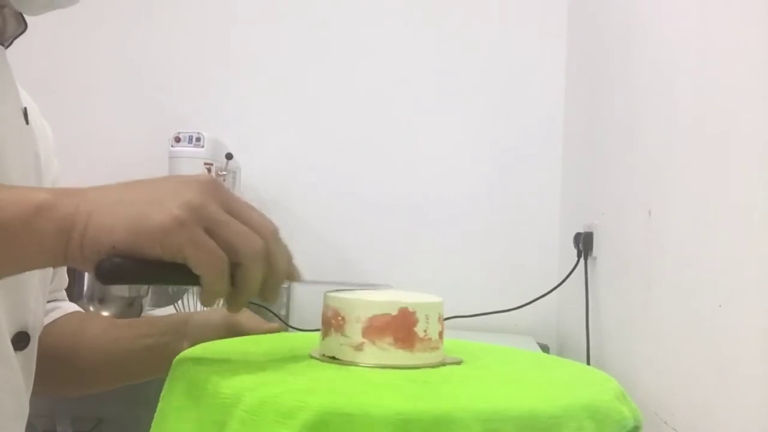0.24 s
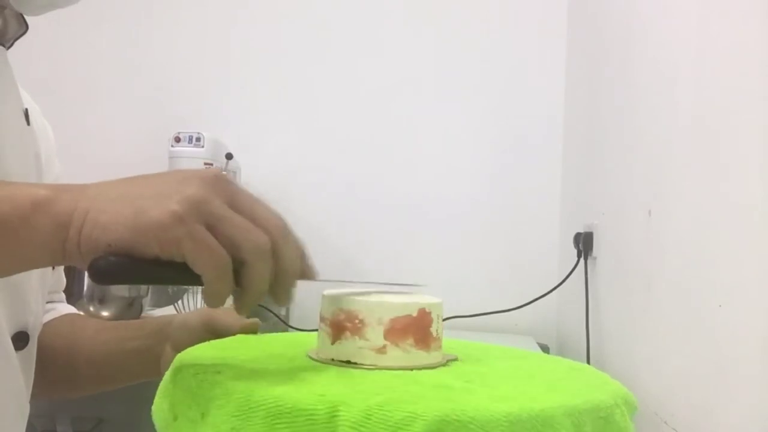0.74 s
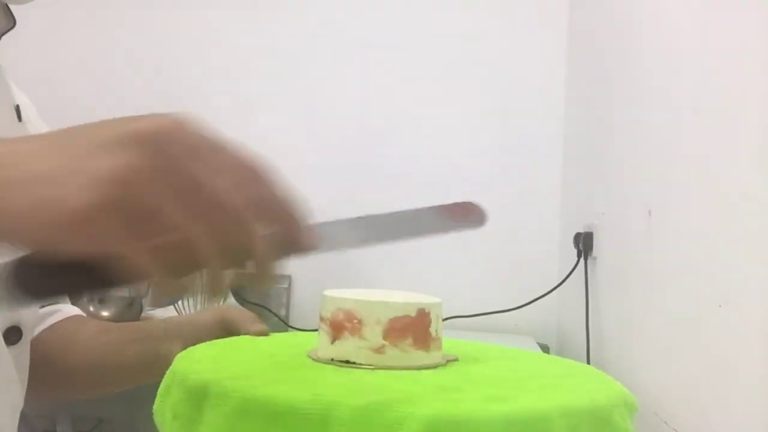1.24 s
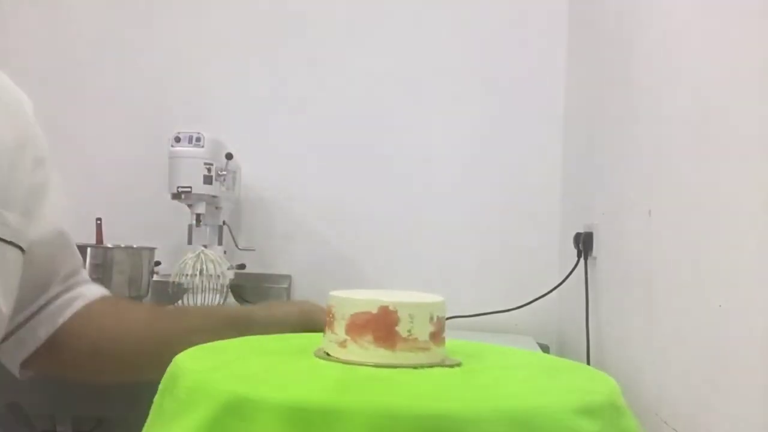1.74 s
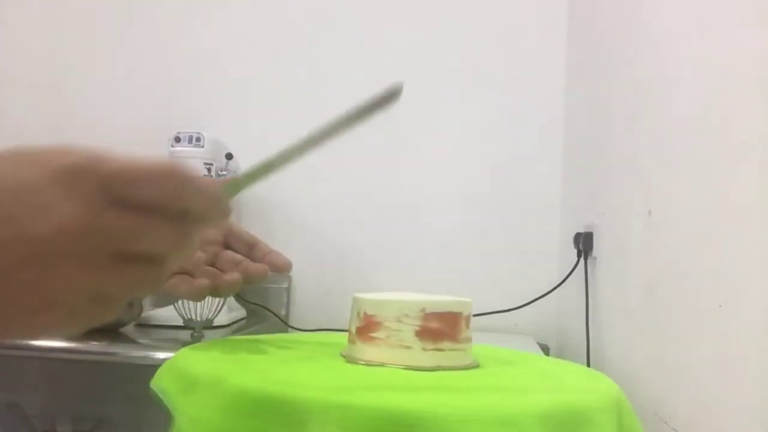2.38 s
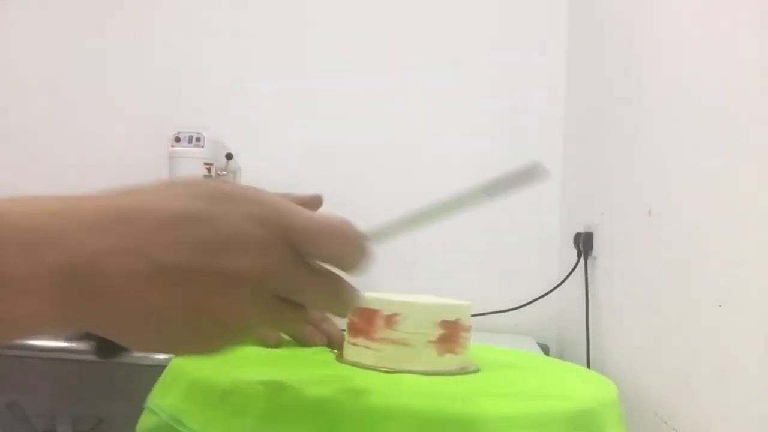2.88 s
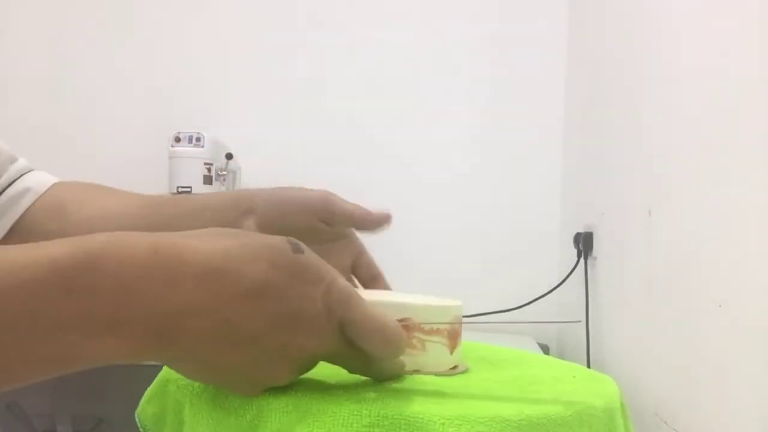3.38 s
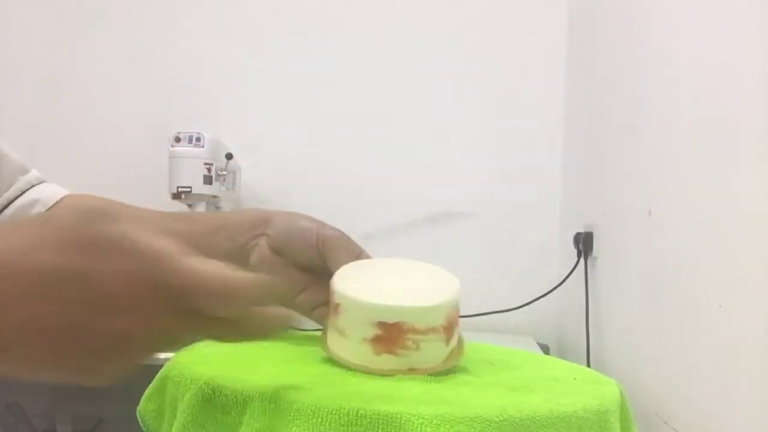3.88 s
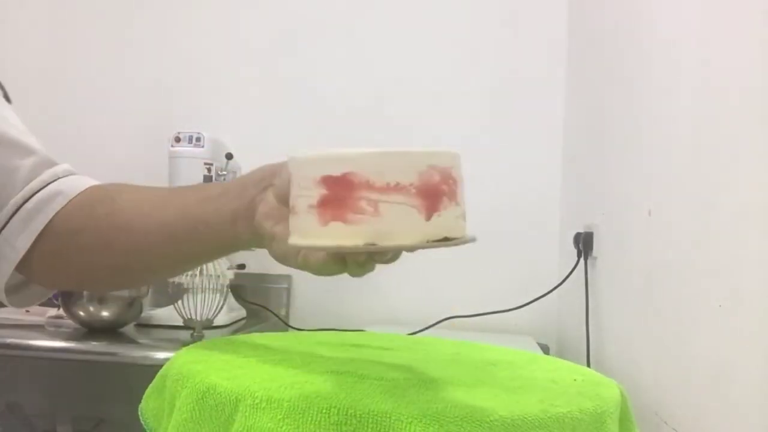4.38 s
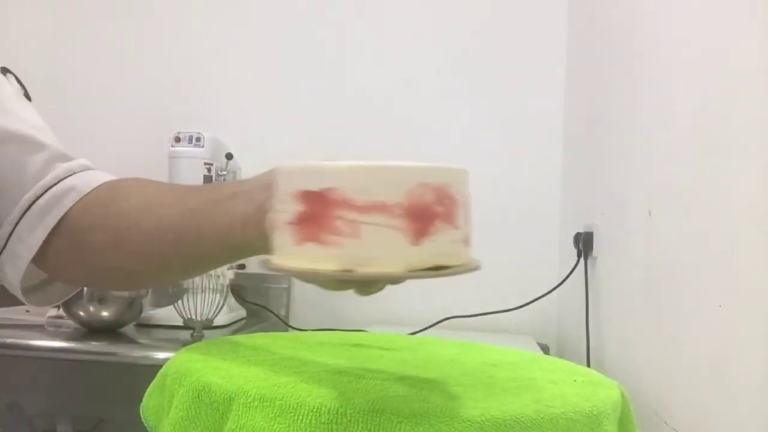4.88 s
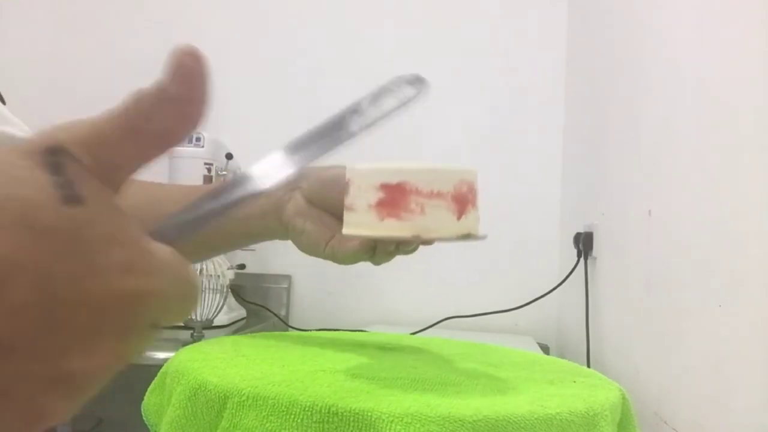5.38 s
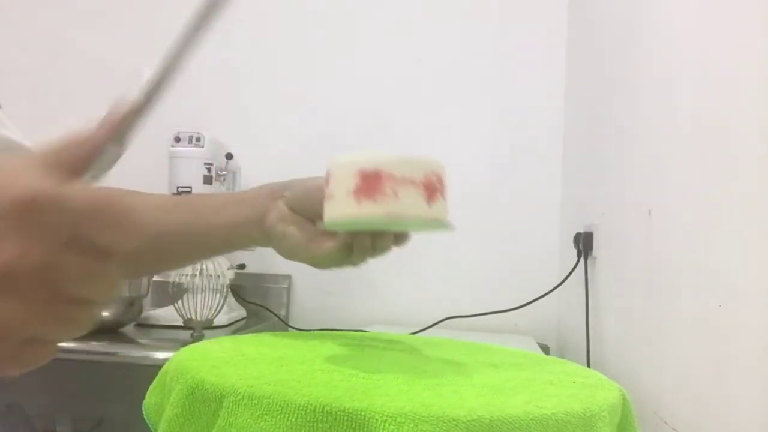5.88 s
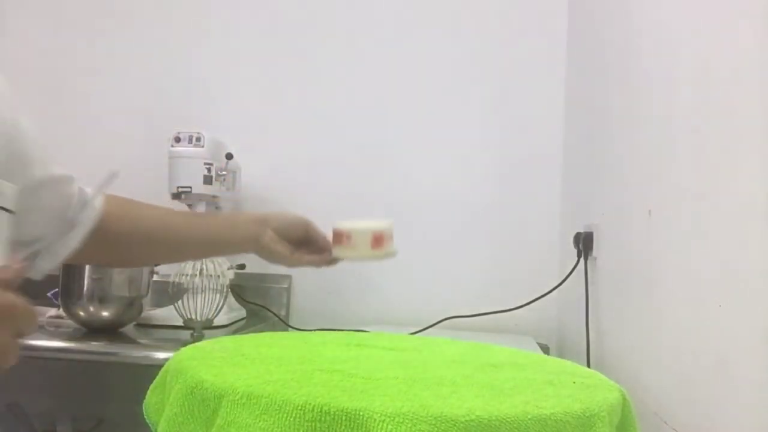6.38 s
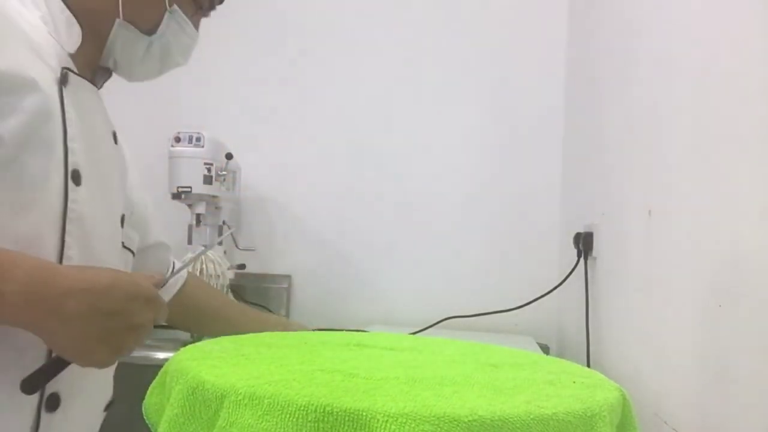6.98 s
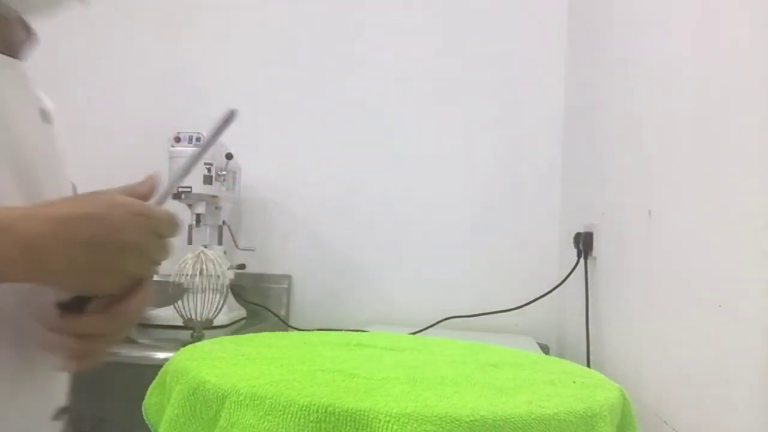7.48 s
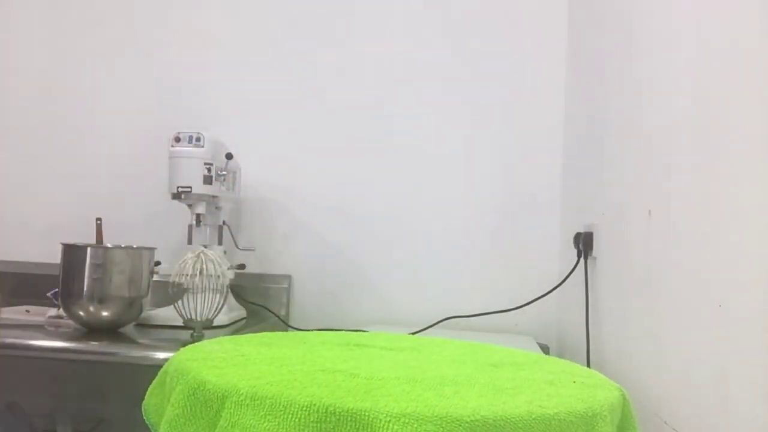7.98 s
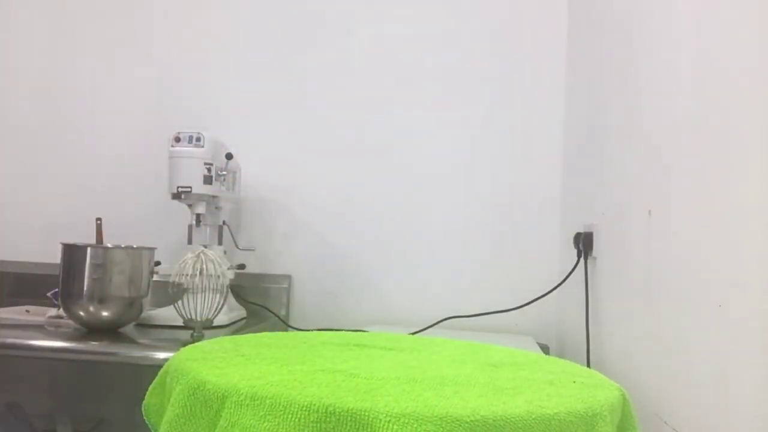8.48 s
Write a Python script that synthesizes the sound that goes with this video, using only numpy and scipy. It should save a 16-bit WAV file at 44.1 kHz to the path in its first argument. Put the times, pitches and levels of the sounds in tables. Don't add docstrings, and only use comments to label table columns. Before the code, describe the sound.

In a small hard-walled kitchen a refrigerator runs throughout, its deep hum mixed with wavering fan air and brief low floor rumbles. A wall clock ticks once a second, each tick followed by a weaker recoil. A padded knock and dull tap come early, a stronger knock with taps and thin metal clicks just past the middle. The camera microphone adds faint hiss and a tiny rapid flutter.

```python
import sys
import numpy as np
from scipy import signal
from scipy.fft import rfft, irfft
from scipy.io import wavfile
from scipy.ndimage import uniform_filter1d

SR = 44100
rng = np.random.default_rng(int(sys.argv[2]) if len(sys.argv) > 2 else 0)


def invert_db(level):
    return 10 ** (np.asarray(level, dtype=float) / 20)


def store_pcm(level_fs):
    pcm = np.round(np.clip(level_fs, -1, 1) * 32767).astype(np.int16)
    wavfile.write(sys.argv[1], SR, np.atleast_2d(pcm).T)


N = 385434
TIME_S = np.arange(N) / SR

SHAFT_HZ, MAINS_HUM_HZ, IN_STEP_S = 49.394, 99.957, .5518
SHAFT_DB, SHAFT_CREEP_DB_PER_S, MAINS_HUM_DB = -41.5, .28, -44.5
SHAFT_START_LOSS_DB, SETTLED_S, SETTLING_S = 2, 1.36, .15
# order, level_db
SHAFT_ORDERS = [(2, -52.5), (3, -63), (4, -64), (5, -68), (11, -65.5)]
# time_s, peak_db, length_s
FLOOR_SHAKES = [(.15, -44.5, 0.33), (.86, -45, 0.19), (1.15, -52, 0.12), (1.76, -46, 0.51),
                (2.12, -43, 0.44), (2.41, -47.5, 0.41), (3.15, -43, .2), (3.42, -45.5, .3), (4.02, -53, .3),
                (6.92, -47, .25), (7.45, -52, 0.2)]
RUMBLE_REST_DB = -61
# freq_hz, density_db
RUMBLE_SPECTRUM = [(33, -37), (44, -7.5), (56, -0.5), (78, -5.5), (95, -8.5), (140, -26.5)]

# freq_hz, level_db
BLADE_TONES = [(116.1, -57.5), (172.45, -59), (231.72, -61.5)]
# freq_hz, density_db
AIR_SPECTRUM = [(28, -50), (40, -20.5), (60, -15), (110, -12.5), (131, -17.5), (237, -15.5), (305, -19.5),
                (369, -13), (430, -26.5), (551, -20.5), (1490, -32), (2190, -33.5), (3300, -57.5),
                (4000, -71)]
AIR_DB = -47.5
# freq_hz, width_hz, level_over_air_db
DUCT_MODES = [(297, 19, 2), (335.7, 12.1, 6.5), (401, 14, 5), (640, 132, -0.5), (1219, 105, 2.5),
              (2196, 510, -3.5)]
# freq_hz, width_hz, level_db
SURGING_MODES = [
    (372.1, 11.2, -1),
    (238.4, 27, -2.5),
]
# time_s, peak_db, length_s
UPPER_AIR_SURGES = [(.1, -52, 0.59), (0.925, -48.5, 0.062), (1.68, -53, 0.26), (2.228, -47.5, 0.33),
                    (2.864, -50, 0.2), (3.24, -53.5, .3), (3.98, -51.5, 0.19), (4.304, -45.5, 0.13),
                    (4.67, -51, 0.083), (5.735, -49, 0.073), (6.3, -50.5, 0.34), (6.662, -45.5, 0.21),
                    (7.275, -44.5, 0.11), (7.55, -51.5, 0.12), (8.146, -52, 0.4), (8.648, -48.5, 0.28)]
# time_s, peak_db, length_s
LOWER_AIR_SURGES = [(.6, -52.5, 0.23), (.95, -52, 0.39), (2.044, -50, .15), (2.516, -50, 0.19),
                    (3.8, -55.5, 0.67), (5.335, -47, 0.12), (5.7, -51.5, 0.95), (6.137, -50, .15),
                    (6.36, -47, 0.23), (6.773, -50.5, 0.3), (7.503, -51, 0.18), (7.95, -54, .3),
                    (8.7, -50.5, 0.46)]
UPPER_REST_DB, LOWER_REST_DB = -58.5, -60.5

# freq_hz, density_db
HISS_SPECTRUM = [(2600, -16), (3300, -6), (3650, 3), (4200, -1.5), (4900, -6), (5500, -2), (6300, -0.5),
                 (7900, -3), (8300, -7.5), (9500, -7.5), (10500, -14.5), (11300, -11), (13500, -12.5),
                 (15100, -10)]
HISS_DB, HISS_WANDER_DB, HISS_WANDER_HZ = -79, .6, 8
BARREL_HZ, BARREL_WIDTH_HZ, BARREL_GAIN = 3610, 140, .45
PORT_DIP_HZ, PORT_DIP_WIDTH_HZ, PORT_HISS_WIDTH_HZ, PORT_HISS_SHARE = 4900, 900, 300, .2
FRAME_HZ, FRAME_START_S = 29.995, .0008
READOUT_GAP_S, READOUT_GAP_LENGTH_S, READOUT_SAG_DB = .0128, .003, -1
# freq_hz, density_db
LENS_BURST_SPECTRUM = [(1200, 2), (2000, 2.5), (2800, -4), (3700, -17), (4900, -32), (6400, -12.5),
                       (8200, -22), (10500, -38), (15000, -33)]
LENS_BURST_DB, LENS_PEAK_S, LENS_WIDTH_S = -61.5, .0032, .0017
# freq_hz, density_db
LENS_RING_SPECTRUM = [(2300, 1), (2900, -1.5), (3400, -10.5), (3700, -4), (4400, -13), (5000, -31.5),
                      (6500, -14), (9000, -27)]
LENS_RING_DB, LENS_RING_S = -74.5, .0098

TICK_START_S, TICK_PERIOD_S, RECOIL_S, RECOIL_DB = .32205, 1.00406, .1731, -7.8
# delay_ms, low_modes_db, high_modes_db
TICK_CONTACTS = [
    (.03, -10, -13),
    (.48, 0, 0),
    (1.47, -4, -20),
    (1.78, -12.5, -19),
    (3.96, -16, -30),
]
# freq_hz, level_db, t60_s
CLOCK_LOW_MODES = [(2204, -41.5, .014), (1831, -45.5, .016), (1550, -39, .0057), (2723, -54.5, .015)]
# freq_hz, level_db, t60_s
CLOCK_HIGH_MODES = [(4177, -77, .016), (6237, -59.5, .004), (7243, -55, .0026), (8007, -74, .008)]
SOFT_HZ = 2900
ROOM_T60_S, ROOM_DB = .25, -12.5

# time_s, peak_db
TABLE_KNOCKS = [
    (0.904, -42),
    (4.66, -39.5),
]
# freq_hz, level_db, t60_s
TABLE_MODES = [(240, 5, 0.052), (366, 6.5, 0.03), (617, -5, 0.025)]
# time_s, peak_db
TABLE_TAPS = [
    (1.0368, -49),
    (4.7705, -56),
    (4.7924, -43),
    (4.7975, -47),
    (5.6678, -55),
]
# freq_hz, level_db, t60_s
TAP_MODES = [(2100, 2, .017), (1660, -13, .011)]
# time_s, peak_db, top_modes_re_low_db
BLADE_CLICKS = [
    (1.669, -71, -6),
    (2.5958, -66, -7),
    (4.7922, -78.5, -9),
    (4.7972, -65, -5),
    (4.806, -71, -10),
    (5.1141, -59, 1),
    (5.12, -66, -11),
]
# freq_hz, level_db, t60_s
BLADE_LOW_MODES = [(4300, -3, 0.0089), (5200, 2, .010), (6300, -0.5, 0.011), (7400, 1, .005)]
# freq_hz, level_db, t60_s
BLADE_TOP_MODES = [(8900, 2, .004), (11000, -5, .0026), (13200, -11, .0026)]

SWISH_S, SWISH_DB, SWISH_RISE_DB_PER_S, SWISH_FALL_DB_PER_S = 8.034, -82, 70, 500
BRIGHTENING = 2.2
# freq_hz, density_db
SLEEVE_DULL = [(6500, -17), (8300, -1), (9800, 0), (10500, -15)]
SLEEVE_BRIGHT = [(10500, -12), (11500, 2), (13500, 0), (15000, -8)]


def coloured(gain_at):
    hz = np.maximum(np.fft.rfftfreq(N, 1 / SR), 1)
    noise = irfft(rfft(rng.standard_normal(N)) * gain_at(hz), N)
    return noise / noise.std()


def slope(points):
    point_hz, point_db = np.transpose(points)
    return lambda hz: invert_db(np.interp(np.log(hz), np.log(point_hz), point_db, left=-80, right=-80))


def peak(hz, width_hz):
    return lambda f: 1 / (1 + (2 * (f - hz) / width_hz) ** 2)


def drift(rate_hz):
    return coloured(lambda hz: 1 / (1 + (np.fft.rfftfreq(N, 1 / SR) / rate_hz) ** 2))


def tone(hz, rms_db, turns):
    return np.sqrt(2) * invert_db(rms_db) * np.cos(2 * np.pi * (hz * (TIME_S - IN_STEP_S) + turns))


def swells(events, rest_db):
    power = invert_db(2 * rest_db)
    for at_s, peak_db, length_s in events:
        power = power + invert_db(2 * peak_db) * np.exp(-(2 * (TIME_S - at_s) / length_s) ** 2)
    return 10 * np.log10(power)


def strikes(times_s, peak_db):
    force = np.full(N, 1e-18)
    np.add.at(force, np.round(np.asarray(times_s) * SR).astype(int), invert_db(np.asarray(peak_db)))
    return force


def softened(force):
    return signal.sosfilt(signal.butter(3, SOFT_HZ, fs=SR, output="sos"), force)


def ring(force, modes):
    out = np.zeros(N)
    for k, (hz, db, t60_s) in enumerate(modes):
        radius = invert_db(-60 / (t60_s * SR))
        angle = 2 * np.pi * hz / SR
        resonator = [0, np.sin(angle)], [1, -2 * radius * np.cos(angle), radius ** 2]
        out += (-1) ** k * invert_db(db) * signal.lfilter(*resonator, force)
    return out


def compressor():
    start_loss_db = SHAFT_START_LOSS_DB / (1 + np.exp((TIME_S - SETTLED_S) / SETTLING_S))
    shaft_db = SHAFT_DB + SHAFT_CREEP_DB_PER_S * TIME_S - start_loss_db
    hum = tone(SHAFT_HZ, shaft_db, 0) + tone(MAINS_HUM_HZ, MAINS_HUM_DB, 0)
    for order, db in SHAFT_ORDERS:
        turns = rng.random() if order > 2 else 0
        hum += tone(order * SHAFT_HZ, db + 1.3 * drift(1.0), turns)
    rumble_db = swells(FLOOR_SHAKES, RUMBLE_REST_DB) - 2.0
    return hum + invert_db(rumble_db) * coloured(slope(RUMBLE_SPECTRUM))


def fans():
    out = np.zeros(N)
    for hz, db in BLADE_TONES:
        out += tone(hz, db + 1.7 * drift(.5), rng.random() + .04 * drift(.15))

    air_gain = slope(AIR_SPECTRUM)
    every_hz = np.fft.rfftfreq(N, 1 / SR) + 1
    air_power = np.mean(air_gain(every_hz) ** 2)
    air = coloured(air_gain)
    for hz, width_hz, db in DUCT_MODES:
        mode = peak(hz, width_hz)
        share = np.mean(mode(every_hz) ** 2) * air_gain(hz) ** 2 / air_power
        air += invert_db(db) * np.sqrt(share) * coloured(mode)

    surges_db = [swells(UPPER_AIR_SURGES, UPPER_REST_DB), swells(LOWER_AIR_SURGES, LOWER_REST_DB)]
    for (hz, width_hz, db), surge_db in zip(SURGING_MODES, surges_db):
        blown = coloured(peak(hz, width_hz))
        steady = blown / np.sqrt(uniform_filter1d(blown ** 2, size=SR // 5))
        out += invert_db(db + surge_db) * steady
    return out + invert_db(AIR_DB) * air


def camera():
    barrel, port = peak(BARREL_HZ, BARREL_WIDTH_HZ), peak(PORT_DIP_HZ, PORT_HISS_WIDTH_HZ)
    spectrum = slope(HISS_SPECTRUM)
    hiss = coloured(lambda hz: spectrum(hz) * (1 + BARREL_GAIN * barrel(hz)) * (1 - PORT_HISS_SHARE * port(hz)))
    since_s = (TIME_S - FRAME_START_S) % (1 / FRAME_HZ)
    sagging = (since_s - READOUT_GAP_S) % (.5 / FRAME_HZ) < READOUT_GAP_LENGTH_S
    hiss_db = HISS_DB + READOUT_SAG_DB * sagging + HISS_WANDER_DB * drift(HISS_WANDER_HZ)

    burst = np.exp(-((since_s - LENS_PEAK_S) / LENS_WIDTH_S) ** 2)
    after = since_s / LENS_RING_S * np.exp(-2 * since_s / LENS_RING_S) * 2 * np.e
    drive = invert_db(LENS_BURST_DB) * burst * coloured(slope(LENS_BURST_SPECTRUM))
    drive += invert_db(LENS_RING_DB) * after * coloured(slope(LENS_RING_SPECTRUM))
    frame = ((TIME_S - FRAME_START_S) * FRAME_HZ + 1).astype(int)
    strength = invert_db(.8 * rng.standard_normal(frame[-1] + 1))[frame]
    return invert_db(hiss_db) * hiss + strength * drive


def clock():
    kicks_s = TICK_START_S + TICK_PERIOD_S * np.arange(9)
    starts_s = np.concatenate([kicks_s, kicks_s + RECOIL_S])
    force_db = np.repeat([0, RECOIL_DB], len(kicks_s)) + .5 * rng.standard_normal(len(starts_s))
    force_db = force_db[:, None]
    delay_ms, low_db, high_db = np.transpose(TICK_CONTACTS)
    times_s = (starts_s[:, None] + delay_ms / 1000).ravel()
    low = softened(strikes(times_s, (force_db + low_db).ravel()))
    high = strikes(times_s, (1.15 * force_db + high_db).ravel())
    return ring(low, CLOCK_LOW_MODES) + ring(high, CLOCK_HIGH_MODES)


def room_tail(hits):
    t_s = np.arange(round(.4 * SR)) / SR
    tail = rng.standard_normal(len(t_s)) * invert_db(-60 * t_s / ROOM_T60_S) * (t_s > .004)
    return signal.fftconvolve(hits, tail / np.sqrt(np.sum(tail ** 2)))[:N]


def handling():
    padded = signal.lfilter([.1], [1, -.9], strikes(*np.transpose(TABLE_KNOCKS)))
    knocks = ring(padded, TABLE_MODES)
    taps = ring(softened(strikes(*np.transpose(TABLE_TAPS))), TAP_MODES)
    times_s, peak_db, top_db = np.transpose(BLADE_CLICKS)
    clicks = ring(strikes(times_s, peak_db), BLADE_LOW_MODES)
    clicks += ring(strikes(times_s, peak_db + top_db), BLADE_TOP_MODES)
    return knocks + taps + clicks


def sleeve():
    since_s = TIME_S - SWISH_S
    below_db = np.minimum(SWISH_RISE_DB_PER_S * since_s, -SWISH_FALL_DB_PER_S * since_s)
    dull = invert_db(below_db) * coloured(slope(SLEEVE_DULL))
    bright = invert_db(BRIGHTENING * below_db - 1.5) * coloured(slope(SLEEVE_BRIGHT))
    return invert_db(SWISH_DB) * (dull + bright)


def scene():
    steady = compressor() + fans() + camera()
    notch = signal.iirnotch(PORT_DIP_HZ, PORT_DIP_HZ / PORT_DIP_WIDTH_HZ, SR)
    hits = signal.lfilter(*notch, clock() + handling())
    mix = steady + hits + invert_db(ROOM_DB) * room_tail(hits) + sleeve()
    return mix[None]


def top_cut(x):
    return signal.sosfilt(signal.butter(12, 15160, fs=SR, output="sos"), x)


def record(dry):
    return top_cut(dry)


dry = scene()
out = record(dry)
store_pcm(out)
```